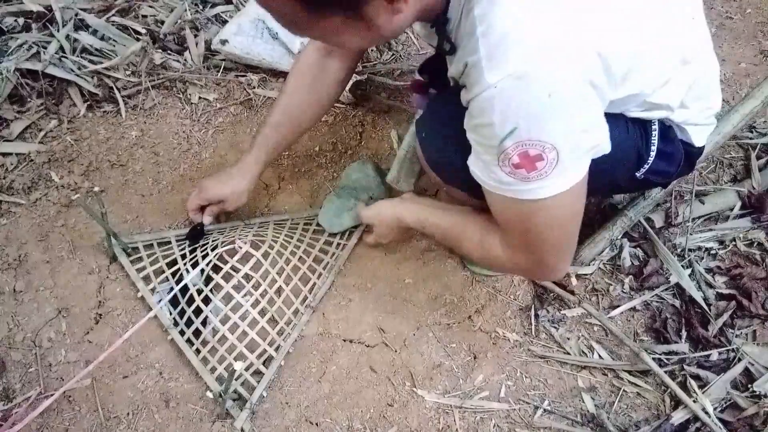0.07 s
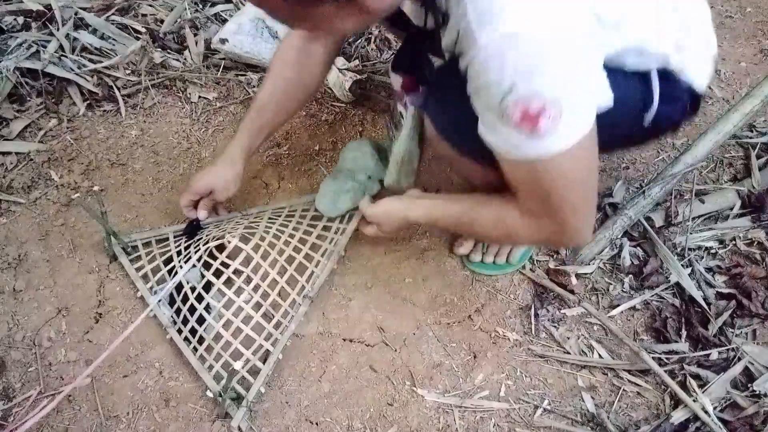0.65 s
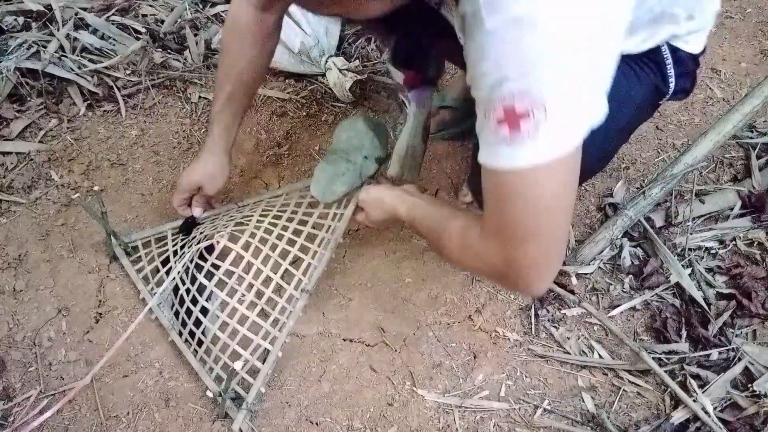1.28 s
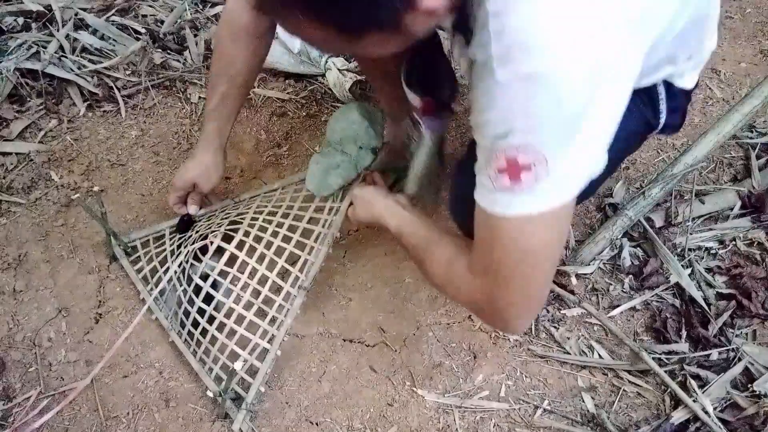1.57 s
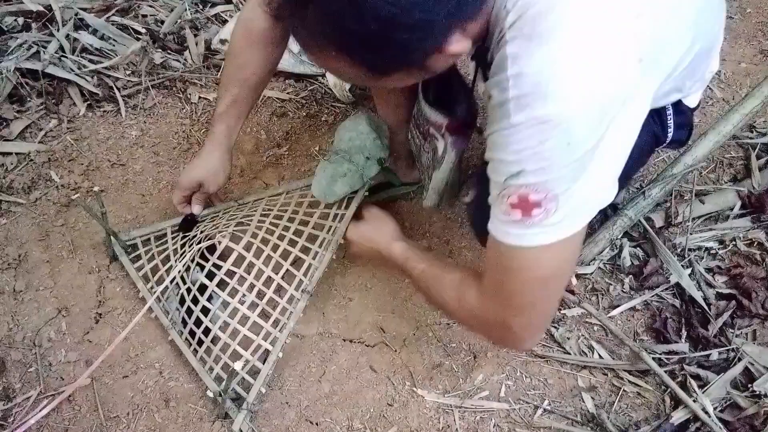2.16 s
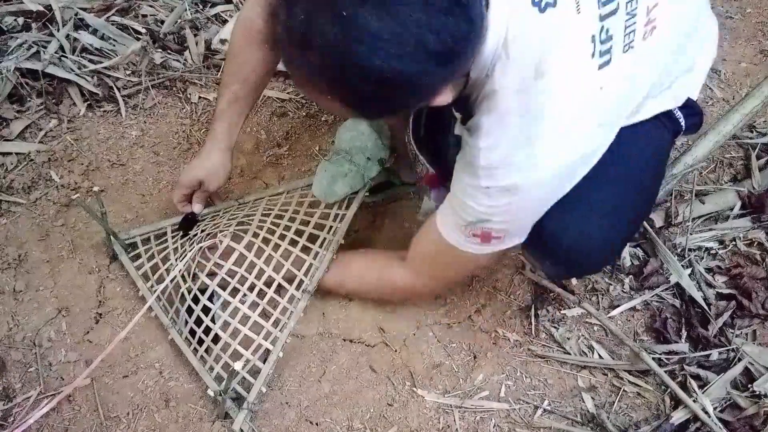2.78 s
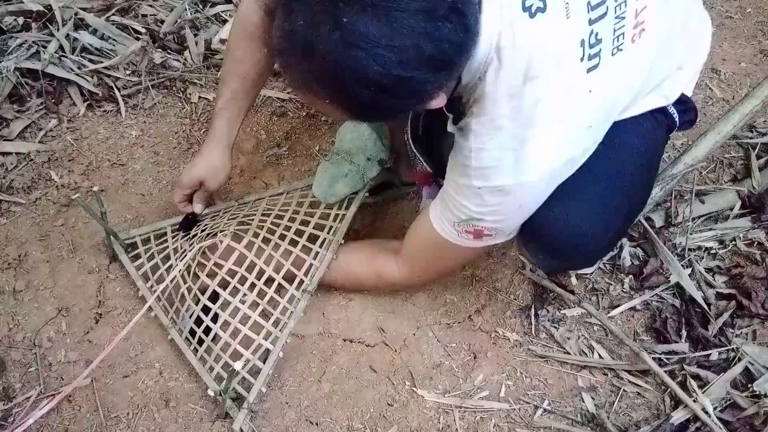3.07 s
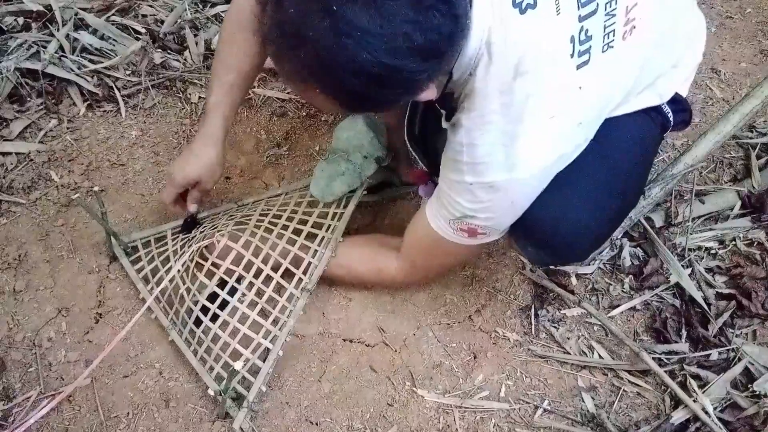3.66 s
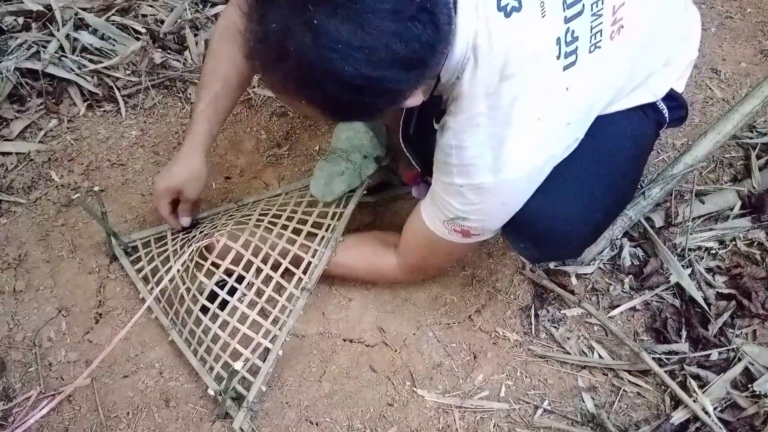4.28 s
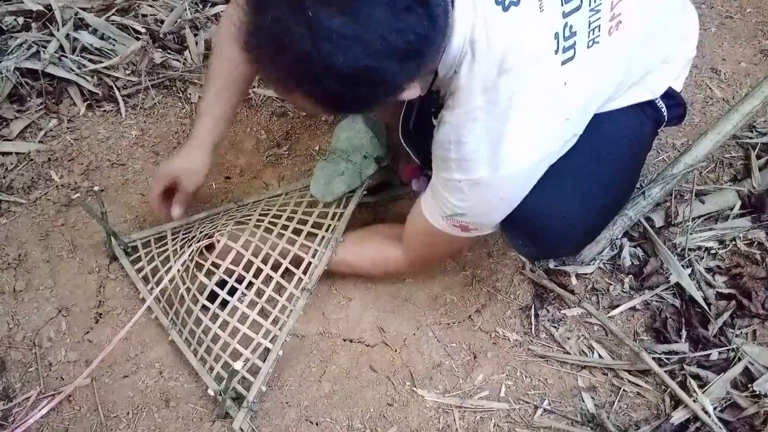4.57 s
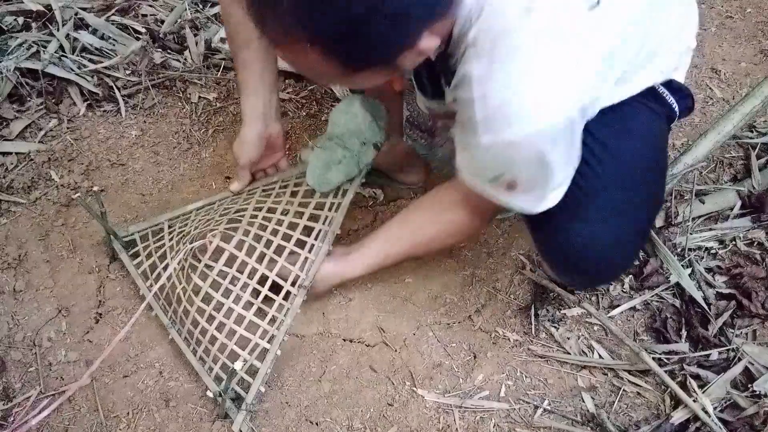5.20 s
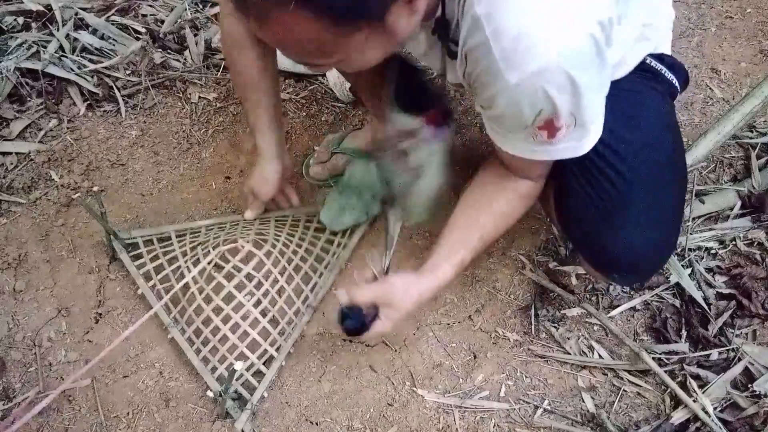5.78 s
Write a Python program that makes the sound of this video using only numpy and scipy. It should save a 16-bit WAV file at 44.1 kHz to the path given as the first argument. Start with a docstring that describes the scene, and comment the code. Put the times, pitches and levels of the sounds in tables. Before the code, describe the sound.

Faint clicks and scrapes of a bamboo trap being handled, then a small bird squawks harshly up close, in a forest.

```python
"""On a forest floor, a small bird is taken by hand from under a woven bamboo trap.
The trap ticks and scrapes over dry soil by stick-slip friction, and feathers brush the weave. Then the
held bird gives five harsh squawks: its syrinx, a nonlinear oscillator, slips between tone and chaos
and is filtered by throat and beak. Behind it a far bird repeats a three-note call with a soft lead-in,
others chip, insects hiss in the trees, and feet shift over a low rumble."""
import sys
import numpy as np
from scipy import signal
from scipy.fft import rfft, irfft, next_fast_len
from scipy.io import wavfile
from scipy.ndimage import uniform_filter1d

SR = 44100
rng = np.random.default_rng(int(sys.argv[2]) if len(sys.argv) > 2 else 0)


def wav_out(sig):
    """Save sig, one row per channel (or a flat mono array), as 16-bit PCM at SR to the path in sys.argv[1]."""
    wavfile.write(sys.argv[1], SR, np.round(np.clip(np.atleast_2d(sig).T, -1, 1) * 32767).astype(np.int16))


N = 257544
TIME = np.arange(N) / SR


def amp(db):
    """Decibels as an amplitude ratio."""
    return 10 ** (np.asarray(db) / 20)


def unit(x):
    """Normalisation to an rms of one."""
    return x / np.sqrt(np.mean(x ** 2) + 1e-20)


def steady(x, size=700):
    """Normalisation to a short-time rms of one, over size samples."""
    return x / np.sqrt(abs(uniform_filter1d(x ** 2, size)) + 1e-12)


def at_frequency(points, hz):
    """Interpolation of (Hz, value) points on a logarithmic frequency axis."""
    f, value = np.transpose(points)
    return np.interp(np.log(hz + 1), np.log(f + 1), value)


def curves(rows, t=TIME):
    """Linear interpolation in time, one curve for each column after the first."""
    times, *columns = np.transpose(rows)
    return [np.interp(t, times, column) for column in columns]


def colour(x, points):
    """Zero-phase filtering by a spectrum of (Hz, dB) points."""
    size = next_fast_len(len(x) + 2048)
    gain = amp(at_frequency(points, np.fft.rfftfreq(size, 1 / SR)))
    return irfft(rfft(x, size) * gain, size)[:len(x)]


def band(x, hz, kind, order=4):
    """A filter with a maximally flat passband."""
    return signal.sosfilt(signal.butter(order, hz, kind, fs=SR, output="sos"), x)


def wander(count, hz):
    """Random modulation: noise of rms one, low-passed at hz."""
    return unit(band(rng.standard_normal(count + 4000), hz, "low", order=2)[-count:])


def resonate(x, hz, width):
    """A damped resonator of gain one, centred on the value or curve hz."""
    turn = np.exp(2j * np.pi * np.cumsum(hz * np.ones(len(x))) / SR)
    pole = np.exp(-np.pi * width / SR)
    return 2 * (turn * signal.lfilter([1 - pole], [1, -pole], x / turn)).real


def add(mix, start, sound):
    """Superposition of a sound on the mix, from start seconds."""
    part = mix[max(round(start * SR), 0):][:len(sound)]
    part += sound[:len(part)]


def arch(u, start, middle, end):
    """A parabola through three values as u runs from 0 to 1."""
    return np.polyval(np.polyfit([0, .5, 1], [start, middle, end], 2), u)


def stroke(t, peak, rise, fall, db, drop_db=21.5, roundness=1.35):
    """The envelope of one movement, drop_db down at one rise before its peak and one fall after."""
    away = np.where(t < peak, (peak - t) / rise, (t - peak) / fall)
    return amp(db - drop_db * np.minimum(away, 10) ** roundness)


def swelling(floor_db, rows):
    """Incoherent addition: a floor and its strokes sum in power."""
    return np.sqrt(amp(floor_db) ** 2 + sum(stroke(TIME, *row) ** 2 for row in rows))


# Decay of the forest's echo. Each row: frequency in Hz, reverberation time (t60) in seconds.
FOREST_DECAY = [(200, .5), (1000, .9), (3500, .7), (8000, .35), (16000, .2)]

def forest(x):
    """Reverberation: scattered echoes from trunks and leaves, the treble dying first."""
    taps = rng.standard_normal(SR) * (rng.random(SR) < 2000 / SR) * (TIME[:SR] > .012)
    hz, t, spectra = signal.stft(taps, SR, nperseg=256)
    decay = amp(-60 * t / at_frequency(FOREST_DECAY, hz)[:, None])
    tail = signal.istft(spectra * decay, SR, nperseg=256)[1]
    return signal.fftconvolve(x, tail / np.linalg.norm(tail))[:N]


def foliage(x, t60=.07):
    """Multiple scattering by leaves spreads a far call into a short smear."""
    t = TIME[:8000]
    taps = rng.standard_normal(len(t)) * amp(-60 * t / t60)
    return signal.fftconvolve(x, taps / np.linalg.norm(taps))[:N]


# Reflections off the soil, the hand and the trap. Each row: delay in seconds, amplitude ratio.
NEAR_REFLECTIONS = [(.0009, 0.027), (.0017, -0.095), (.0031, 0.23), (.0052, .16), (.0083, -0.075)]

def bounce(x):
    """Comb filtering: early reflections interfere with the direct sound and ripple its spectrum."""
    out = x.copy()
    for delay, gain in NEAR_REFLECTIONS:
        add(out, delay, gain * x)
    return out


# Spectrum of the still air. Each row: frequency in Hz, gain in dB.
AIR_SPECTRUM = [(110, -50), (180, -13), (600, -12.5), (1200, -16.5), (4000, -22.5), (9000, -31.5),
                (10500, -23.5), (13500, -34.5), (15500, -22.5)]

def air(level_db=-72.5):
    """The ambient floor is stationary broadband noise."""
    return amp(level_db) * unit(colour(rng.standard_normal(N), AIR_SPECTRUM))


# Spectrum of the rumble. Each row: frequency in Hz, gain in dB.
RUMBLE_SPECTRUM = [(12, -63), (24, -12.5), (81, 4.5), (135, 4.5), (221, -10), (260, -10), (340, -49.5),
                   (570, -120)]
# Its swells. Each row: peak time, rise and fall in seconds, level in dB.
RUMBLE_SWELLS = [(.95, .2, 0.45, -55.5), (3.37, 0.055, 0.024, -55), (3.949, 0.19, 0.6, -61),
                 (5, .25, 0.37, -60)]

def rumble(start_db=-58, ebb_db_per_s=2.18):
    """Low noise ebbs by exponential decay as the crouching body settles, swelling now and then."""
    heave = swelling(start_db - ebb_db_per_s * TIME, RUMBLE_SWELLS) * amp(2.2 * wander(N, 7.3))
    noise = unit(colour(rng.standard_normal(N), RUMBLE_SPECTRUM))
    return band(heave * noise, 38, "high", order=2)


# Insect resonances. Each row: centre in Hz, width of each resonator in Hz, relative level in dB.
INSECT_BANDS = [(5570, 760, 5), (6400, 1360, 8.5), (7230, 900, 3), (8550, 300, -1), (8860, 870, 8.5)]
# Course of the chorus. Each row: time in seconds, level in dB.
CHORUS_LEVEL = [(0, -62), (1.3, -63), (2.2, -62.5), (2.6, -67), (3.2, -65), (4, -62.5), (4.8, -63),
                (5.84, -63)]

def insects(pulses_per_s=15, pulse_db=2.2):
    """Amplitude modulation of resonant noise bands gives an unevenly pulsing chorus."""
    noise = rng.standard_normal(N)
    chorus = sum(amp(db) * unit(resonate(resonate(noise, hz, width), hz, width))
                 for hz, width, db in INSECT_BANDS)
    pulse = np.sin(2 * np.pi * np.cumsum(pulses_per_s * (1 + .19 * wander(N, 9.5))) / SR)
    level_db = curves(CHORUS_LEVEL)[0] + pulse_db * pulse + 2 * wander(N, 23)
    return amp(level_db) * unit(band(chorus, [4800, 9800], "band", order=6))


def whistle(length, pitches, db, warble, attack_s=.007, release_s=.01):
    """Frequency modulation: a sine glides through three pitches, straying by the share warble."""
    t = np.arange(0, length, 1 / SR)
    hz = arch(t / length, *pitches) * (1 + warble * wander(len(t), 400))
    ramp = np.minimum(t / attack_s, (length - t) / release_s)
    gate = np.sin(np.pi / 2 * np.minimum(ramp, 1)) ** 2
    return amp(db) * np.sin(2 * np.pi * np.cumsum(hz) / SR) * gate


# The far bird's phrases. Each row: time in seconds, level in dB.
CALL_PHRASES = [(0.477, -49.5), (1.314, -49.5), (2.12, -51), (2.936, -50), (3.752, -50), (4.55, -49.5),
                (5.371, -49.5)]
# Notes of a phrase. Each row: offset and length in seconds, start, middle and end pitch in Hz,
# level in dB relative to the phrase.
CALL_NOTES = [(-.125, .032, 923, 895, 840, -5.5), (0, .034, 1322, 1067, 870, 3.5),
              (0.065, .037, 1193, 992, 921, 4), (0.132, .046, 1261, 1030, 1023, 3.5)]
# Echoes off trunks. Each row: delay in seconds, gain in dB.
TRUNK_ECHOES = [(0.065, -13.5), (.108, -14.5), (.16, -22)]

def far_caller():
    """Multipath propagation: slightly varied notes arrive directly, through leaves and off trunks."""
    direct = np.zeros(N)
    for start, phrase_db in CALL_PHRASES:
        for offset, length, *pitches, note_db in CALL_NOTES:
            sharp, loud = rng.standard_normal(2)
            tuned = np.multiply(pitches, 1 + .008 * sharp)
            level_db = phrase_db + note_db + .77 * loud
            add(direct, start + offset, whistle(length, tuned, level_db, warble=.008))
    heard = direct + amp(-12) * (foliage(direct) + forest(direct))
    for delay, db in TRUNK_ECHOES:
        add(heard, delay, amp(db) * foliage(direct))
    return heard


# Chips of small birds overhead. Each row: start and length in seconds, start, middle and end pitch
# in Hz, relative level in dB.
CANOPY_CHIPS = [(.564, 0.031, 4680, 3540, 3670, -47.5), (1.82, 0.044, 4610, 3596, 3700, -48.5),
                (1.895, .04, 4710, 3600, 3700, -48.5), (2.1, .04, 4780, 3610, 3680, -48.5),
                (2.179, 0.033, 4880, 3600, 3750, -49.5), (2.375, 0.017, 3200, 2790, 2700, -59),
                (2.844, 0.034, 3450, 2810, 2550, -59.5), (3.259, .042, 4830, 3560, 3650, -47.5),
                (4.847, 0.069, 3480, 2830, 2660, -60)]

def canopy_birds(gain_db=-2):
    """Diffuse scattering: buzzy chips arrive more through the trees than directly."""
    direct = np.zeros(N)
    for start, length, *pitches, db in CANOPY_CHIPS:
        add(direct, start, whistle(length, pitches, db, warble=.045))
    return amp(gain_db) * (direct + amp(-1) * foliage(direct) + amp(-3) * forest(direct))


# Shifting feet and bumps of the hand. Each row: peak time, rise and fall in seconds, level in dB.
BODY_BUMPS = [(0, .01, .08, -61.5), (.14, .08, 0.17, -63), (.55, 0.14, 0.14, -57.5), (.92, 0.24, 0.42, -60),
              (1.12, 0.17, 0.075, -54.5), (1.3, 0.37, 0.18, -60.5), (1.617, 0.24, 0.11, -54),
              (1.783, 0.045, 0.033, -40), (1.84, 0.024, 0.091, -56), (1.97, 0.098, 0.07, -53),
              (3.35, 0.03, 0.036, -63.5), (4.23, .08, 0.19, -65.5), (5.302, 0.23, 0.18, -64.5),
              (5.489, 0.073, 0.043, -59)]
# Their dull spectrum. Each row: frequency in Hz, gain in dB.
BUMP_SPECTRUM = [(100, -10), (190, -9), (400, -6), (700, -8.5), (1100, -16), (2000, -28.5)]
SHUFFLE_DB = -76.5  # quiet shuffling between the bumps

def feet():
    """Soft impacts radiate mostly low frequencies: dull noise swells with each movement."""
    envelope = swelling(SHUFFLE_DB, BODY_BUMPS) * amp(3.2 * wander(N, 40))
    noise = unit(colour(rng.standard_normal(N), BUMP_SPECTRUM))
    return band(envelope * noise, 38, "high", order=2)


# Spectrum of dry soil grains. Each row: frequency in Hz, gain in dB.
GRIT_SPECTRUM = [(150, -16), (400, -26.5), (800, -10.5), (1400, -2.5), (2300, -8.5), (4500, 1), (6500, 0.5),
                 (8000, -9.5), (9600, -5), (13300, -28), (15500, -12.5)]

def crumbs(per_s=140, relative_db=-13.5):
    """Shot noise: dry soil gives way in tiny separate clicks, louder whenever weight shifts."""
    clicks = rng.standard_normal(N) * (rng.random(N) < per_s / SR)
    crackle = unit(colour(bounce(clicks), GRIT_SPECTRUM))
    return amp(relative_db) * swelling(SHUFFLE_DB, BODY_BUMPS) * crackle


# The trap and the arm drag over soil. Each row: peak time, rise and fall in seconds,
# relative level in dB, weight of the hollow ring in dB.
SOIL_DRAGS = [(.005, 0.014, 0.041, -50, -38), (.76, 0.042, 0.024, -53, -47),
              (0.986, 0.013, 0.024, -52, -33), (1.07, 0.056, 0.14, -43.5, -13),
              (1.141, 0.048, 0.023, -45.5, -0.5), (1.55, 0.021, 0.035, -53, -10),
              (1.63, 0.088, 0.037, -34.5, -13), (1.676, 0.021, 0.077, -54.5, -25),
              (1.757, .01, 0.031, -47, 11), (1.78, 0.025, 0.024, -31, -6), (1.81, 0.013, 0.027, -44.5, 2.5),
              (1.89, 0.092, 0.085, -52.5, -9), (1.96, .02, 0.041, -48, 7), (4.982, .05, 0.14, -58, -21),
              (5.581, 0.093, 0.25, -55, -6.5), (5.69, 0.053, .06, -58, -10)]

def scrape(peak, rise, fall, level_db, ring_db, grains_per_s=4500, ring_hz=2200, width_hz=900):
    """Stick-slip friction: soil and dry leaf catch and slip, exciting the bamboo frame's resonance."""
    t = np.arange(max(peak - 2 * rise, 0), peak + 2 * fall, 1 / SR)
    size = amp(2.8 * np.minimum(rng.exponential(1, len(t)), 4) + 2 * wander(len(t), 59))
    grains = bounce(size * rng.standard_normal(len(t)) * (rng.random(len(t)) < grains_per_s / SR))
    grit = steady(colour(grains, GRIT_SPECTRUM), size=1500)
    ring = steady(resonate(resonate(grains, ring_hz, width_hz * 2), ring_hz, width_hz), size=1500)
    sound = amp(2) * grit + amp(ring_db + 1) * ring
    gate = np.clip((t - t[0]) / .0016, 0, 1) * np.clip((t[-1] - t) / .0016, 0, 1)
    return t[0], stroke(t, peak, rise, fall, level_db) * sound * gate


# Bamboo ticks. Each row: start in seconds, peak of the snap in dB, relative knock and fizz in dB.
BAMBOO_TICKS = [(0.489, -41, -22, -10), (0.5156, -13, -48, -13.5), (0.9803, -33, -28, -20),
                (1.2378, -27, -18.5, -36), (1.3578, -24.5, -8, 12), (1.4165, -20.5, -8, 19),
                (1.535, -31, -3.5, -27), (1.55, -28.5, -2, -20), (1.673, -30, -29, -20),
                (1.7891, -16.5, -7, -22), (2.0576, -36, -30, -22), (2.1278, -40, -8, -20),
                (4.0682, -39, -40, -17.5), (4.6812, -40, -42.5, -10), (4.9421, -24, -12.5, -16)]
# Spectrum of the snap. Each row: frequency in Hz, gain in dB.
SNAP_SPECTRUM = [(1800, -10), (3000, -11), (4900, -6.5), (6800, 5), (9500, 3), (12000, -5.5), (13800, -13),
                 (15500, 4)]

def tick(start, peak_db, knock_db, fizz_db, snap_t60=.0094, rattle_t60=.09, rattle_db=-21):
    """Impulsive excitation: a strip slips with a bright snap, a woody knock and a damped rattle."""
    t = np.arange(4096) / SR
    decay = amp(-60 * t / snap_t60) + amp(rattle_db - 60 * t / rattle_t60)
    burst = rng.standard_normal(len(t)) * decay
    snap = colour(burst, SNAP_SPECTRUM)
    snap = unit(snap) + amp(fizz_db) * unit(band(snap, 9000, "high"))
    knock = unit(band(burst, [900, 4200], "band", order=2))
    return start, amp(peak_db) * (snap + amp(knock_db) * knock) / abs(snap).max()


# Feathers brush the weave. Each row: start and length in seconds, level in dB.
FEATHER_BRUSHES = [(0.735, 0.038, -52), (2.395, 0.093, -63), (3.312, 0.11, -51), (4.368, 0.173, -50.5),
                   (4.946, 0.078, -50)]
# Their spectrum. Each row: frequency in Hz, gain in dB.
FEATHER_SPECTRUM = [(5000, -28), (8000, -5.5), (9300, 1), (11000, -0.5), (13300, -8), (15000, -1)]

def brush(start, length, db):
    """Friction noise: barbs slip over bamboo in a fine, bright fizz."""
    count = int(length * SR)
    friction = rng.standard_normal(count) * amp(1.9 * wander(count, 300))
    fizz = unit(colour(friction, FEATHER_SPECTRUM))
    return start, amp(db) * fizz * signal.windows.tukey(count, .3)


def pitch(age, length, start_hz, middle_hz, end_hz, scoop, waver, droop):
    """The fundamental frequency follows an arch; it may scoop up, waver, and droop as air runs out."""
    rising = scoop * np.exp(-(age / .043) ** 2)
    wavering = waver * np.cos(2 * np.pi * 6.5 * age)
    sinking = droop * np.maximum(1 - (length - age) / .033, 0)
    return arch(age / length, start_hz, middle_hz, end_hz) * (1 - rising - wavering - sinking)


# Spans of locked vibration. Each row: start and end in seconds, roughness and period doubling, 0 to 1.
SYRINX_LOCKS = [(3.3, 3.385, .34, .05), (3.41, 3.49, .47, .1), (3.77, 3.845, .34, .75),
                (4.12, 4.28, .33, .05), (4.265, 4.345, .21, .06), (5.1, 5.52, .11, 0), (5.83, 5.9, .3, .1)]

def regime(t, transition_s=.025):
    """Mode locking: for set spans the syrinx leaves its chaotic rasp for a clearer tone."""
    rough, doubling = .74, .42  # in chaos
    for begin, end, lock_rough, lock_doubling in SYRINX_LOCKS:
        locked = np.clip(.5 + np.minimum(t - begin, end - t) / transition_s, 0, 1)
        rough = rough + locked * (lock_rough - rough)
        doubling = doubling + locked * (lock_doubling - doubling)
    return rough, doubling


# Hiss of air forced past the syrinx. Each row: frequency in Hz, gain in dB.
BREATH_SPECTRUM = [(1500, -42.5), (3000, -12.5), (5000, -1), (6200, -1), (7500, 4), (11000, 2.5),
                   (15000, -17.5)]

def syrinx(hz, rough, doubling, flutter, odd_db=-6, tilt_db=1.5, rasp_db=-6.5, hiss_db=-11):
    """Nonlinear vibration of membranes: harmonics, period-doubling subharmonics and pulsed noise."""
    count = len(hz)
    # the rougher the voice, the more its cycles differ in length and its pitch swerves
    jitter = .068 * wander(count, 406)
    swerve = .09 * rough ** 2 * wander(count, 42.2)
    cycles = np.cumsum(hz * (1 + rough * (jitter + .045 * flutter + swerve))) / SR
    # the two sides beat in turn, so even harmonics lead; the fundamental shows as they fall out of step
    harmonics = np.zeros(count)
    for k in range(1, 9):
        weight = amp(odd_db * (k % 2) + tilt_db * k) * (1.8 * rough if k == 1 else 1)
        tremble = np.exp(.23 * wander(count, 110))
        harmonics += weight * tremble * np.cos(2 * np.pi * (k * cycles + rng.random()))
    subharmonics = sum(amp(tilt_db * k / 2) * np.cos(np.pi * k * cycles + 2 * np.pi * rng.random())
                       for k in range(3, 17, 2))
    tone = (1 - .5 * rough) * unit(harmonics + amp(1) * doubling * subharmonics)
    # air is let through in one puff a cycle
    puffs = unit((1 + .5 * np.cos(2 * np.pi * cycles)) * rng.standard_normal(count))
    return tone + rough * amp(rasp_db) * puffs + amp(hiss_db) * unit(colour(puffs, BREATH_SPECTRUM))


# The held bird's squawks. Each row: start, length, attack and release in seconds; start, middle and end
# effort and opening burst in dB; start, middle and end pitch in Hz; scoop, waver and droop as shares.
HELD_SQUAWKS = [ (3.321, 0.088, 0.0047, 0.041, -30, -26.5, -28.5, 0.5, 1134, 1210, 1930, 0.0096, 0, 0),
                (3.427, 0.48, 0.012, 0.036, -43, -34, -38.5, 25, 1129, 1082, 1230, 0.00063, 0.00048, 0),
                (4.139, 0.41, 0.013, 0.041, -33, -31.5, -28, 1, 1237, 1187, 1084, .165, 0, 0),
                (5.077, 0.463, 0.038, 0.045, -32, -26, -36.5, 1.5, 1115, 1117, 1122, 0.0096, 0.0207, .3),
                (5.809, 0.044, 0.0093, 0.0029, -34, -25.5, -22, -1.5, 945, 1050, 1300, 0.0013, 0, 0.0073), ]
# Jolts of the struggle. Each row: time in seconds, pitch rise as a share, level change in dB,
# half width in seconds.
STRUGGLE_JOLTS = [(3.4316, 0.0076, 8, 0.0028), (3.4362, 0.006, -20, .0023), (3.4431, .12, 1.5, .0025),
                  (3.453, .18, 3.5, 0.0025), (3.463, .16, 2.5, .0033), (3.483, 0.27, 4, 0.0016),
                  (4.412, -0.057, 2, 0.00572), (4.446, .19, -5.5, .0045), (5.3213, 0.07, 5, 0.0031),
                  (5.338, 0.063, 2.5, 0.003), (5.3526, 0.22, 3.5, 0.0034), (5.37, 0.13, 6, 0.0031),
                  (5.383, 0.26, 2, 0.0035), (5.403, 0.2, -1, 0.0051), (5.429, -0.019, 3.5, 0.0065),
                  (5.44, 0.2, -1.5, 0.005), (5.46, 0.03, 1, 0.0049), (5.468, -0.071, 0, 0.0034),
                  (5.48, .03, -1, 0.0096), (5.503, 0.056, 0, 0.0036)]
# The beak opens and shuts, one curve a squawk. Each row of a curve: time in seconds,
# treble in dB over the throat tone, beak resonance in Hz.
BEAK_CURVES = [
    [(3.322, -16.5, 5200), (3.372, -21.5, 5300), (3.39, -8, 5400)],
    [(3.43, -2.5, 5830), (3.6, -4, 5400), (3.69, -5, 5500), (3.76, 5, 5700), (3.9, -2, 5680)],
    [(4.148, -4, 5300), (4.18, 4.5, 5750), (4.33, 6.5, 5620), (4.398, 2.5, 4530), (4.44, -9, 3870),
     (4.54, -30, 3500)],
    [(5.1, 0.5, 6060), (5.146, 6, 6600), (5.204, 0, 5880), (5.34, 4, 5730), (5.41, 11, 6600),
     (5.435, 10.5, 6500), (5.455, 10, 5230), (5.53, 13, 4000)],
    [(5.813, -5, 6220), (5.825, 2.5, 5900)],
]
# Response of the throat. Each row: frequency in Hz, gain in dB.
THROAT_RESPONSE = [(700, -41), (1170, -15.5), (1400, -22.5), (1720, -3), (2250, -6.5), (2800, -4.5),
                   (3350, 2.5), (3900, -0.5), (4700, -2.5), (6700, -5.5), (7400, -12.5), (9000, -15.5),
                   (13500, -18), (15000, -2)]

def squawk(row, beak_curve, beak_db=17, beak_width_hz=1100, flutter_hz=85):
    """Source and filter: the syrinx sounds through throat and beak, shaken by the bird's struggle."""
    start, length, attack, release, start_db, middle_db, end_db, burst_db, *tune = row
    age = np.arange(0, length, 1 / SR)
    t = start + age
    effort_db = arch(age / length, start_db, middle_db, end_db) + burst_db * np.exp(-(age / .05) ** 2)
    hz = pitch(age, length, *tune)
    rough, doubling = regime(t)
    for when, rise, db, width in STRUGGLE_JOLTS:
        jolt = np.exp(-((t - when) / width) ** 2)
        hz *= 1 + rise * jolt
        effort_db += db * jolt
        rough += abs(rise) * jolt
    rough = np.clip(rough, 0, 1)
    flutter = np.sin(2 * np.pi * np.cumsum(flutter_hz * (1 + .54 * wander(len(t), 40))) / SR)
    throat = bounce(colour(syrinx(hz, rough, doubling, flutter), THROAT_RESPONSE))
    treble_db, beak_hz = curves(beak_curve, t)
    beak = throat + amp(beak_db) * resonate(throat, beak_hz, beak_width_hz)
    throat_tone = steady(band(throat, 2888, "low", order=8))
    treble = amp(treble_db) * steady(band(beak, 3360, "high", order=8))
    envelope = amp(effort_db + .88 * wander(len(t), 51)) * (1 + .29 * rough * flutter)
    onset = np.minimum(age / attack, 1)
    ending = np.sin(np.pi / 2 * np.minimum((length - age) / release, 1)) ** 2
    return start, envelope * (throat_tone + treble) * onset * ending


def scene(echo_db=-35.5):
    """Superposition: bird and trap close by, with faint reverberation, over the sounds of the forest."""
    near = np.zeros(N)
    for row, beak_curve in zip(HELD_SQUAWKS, BEAK_CURVES):
        add(near, *squawk(row, beak_curve))
    for source, rows in (scrape, SOIL_DRAGS), (tick, BAMBOO_TICKS), (brush, FEATHER_BRUSHES):
        for row in rows:
            add(near, *source(*row))
    echo = amp(echo_db) * forest(near)
    background = crumbs() + far_caller() + canopy_birds() + insects() + air() + rumble() + feet()
    return (near + echo + background)[None]


def record(dry, cutoff_hz=15880):
    """Band limiting by a linear-phase low-pass filter."""
    lowpass = signal.firwin(401, cutoff_hz, window=("kaiser", 8), fs=SR)
    return signal.oaconvolve(dry, lowpass[None], "same")


dry = scene()
out = record(dry)
wav_out(out)
```